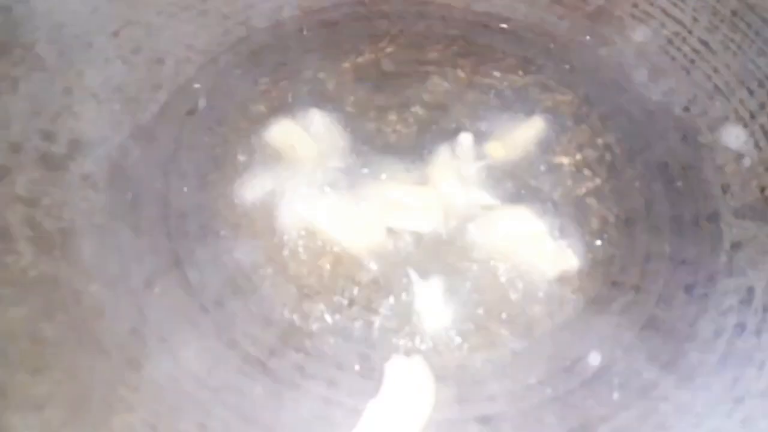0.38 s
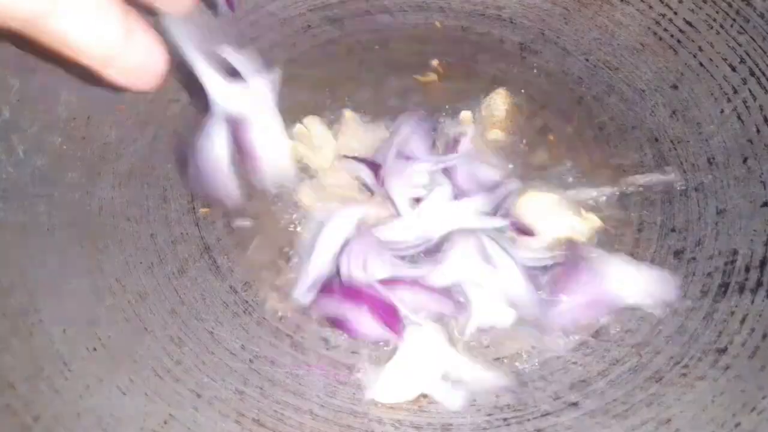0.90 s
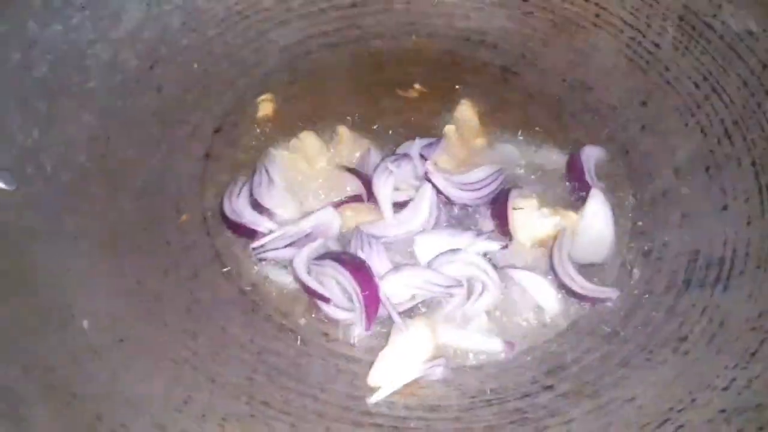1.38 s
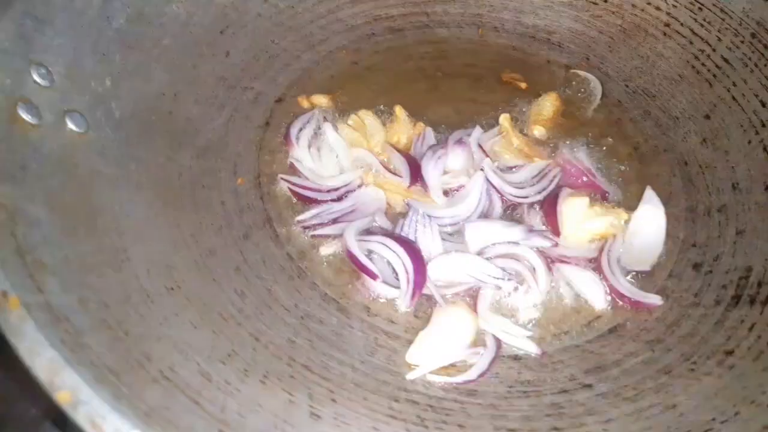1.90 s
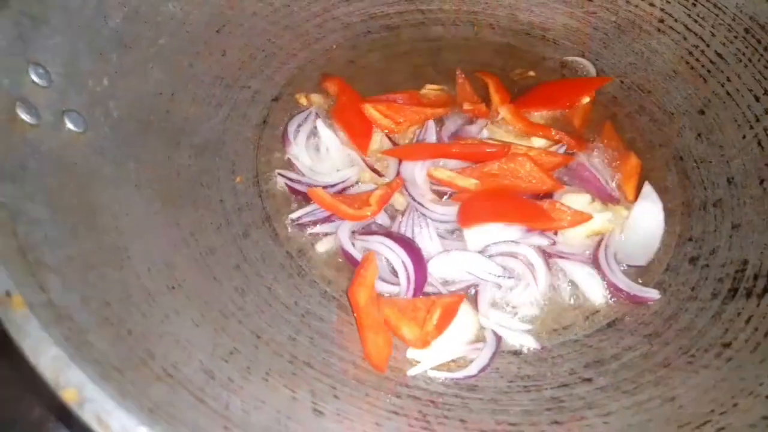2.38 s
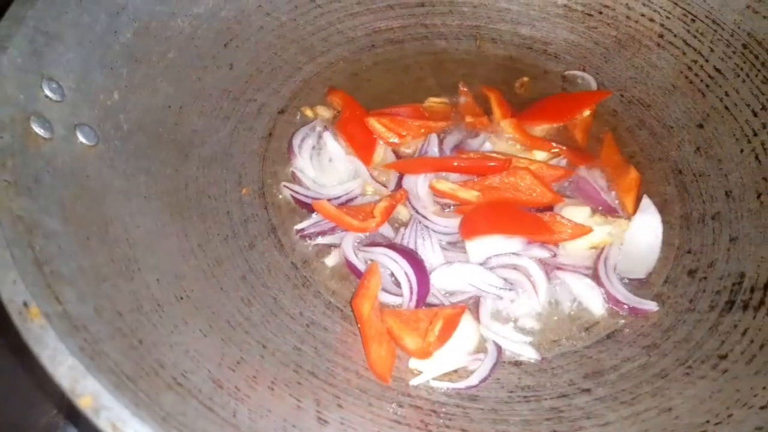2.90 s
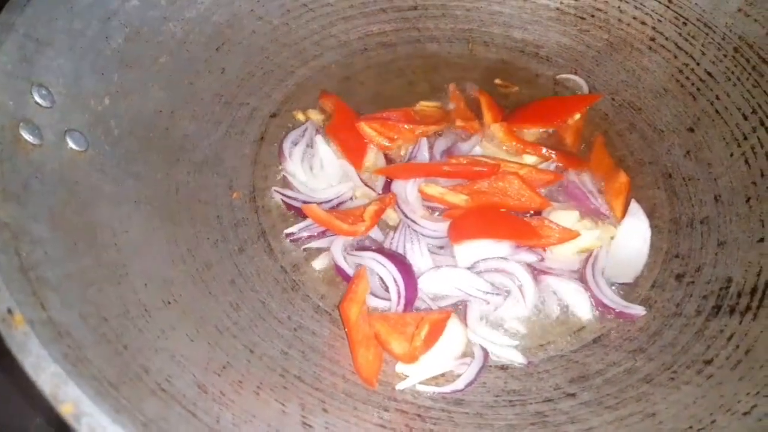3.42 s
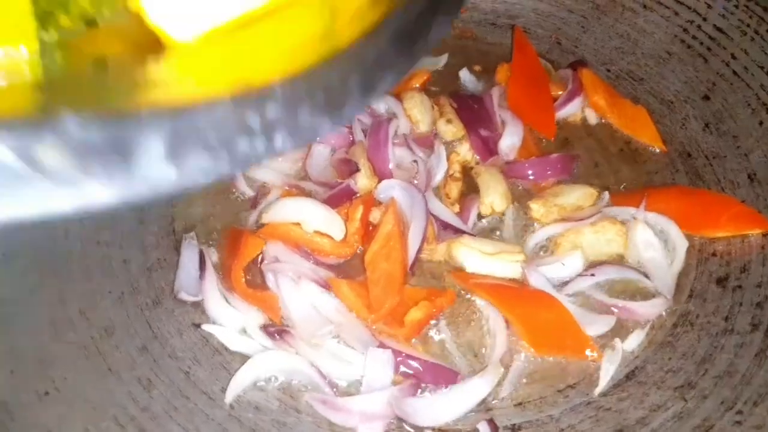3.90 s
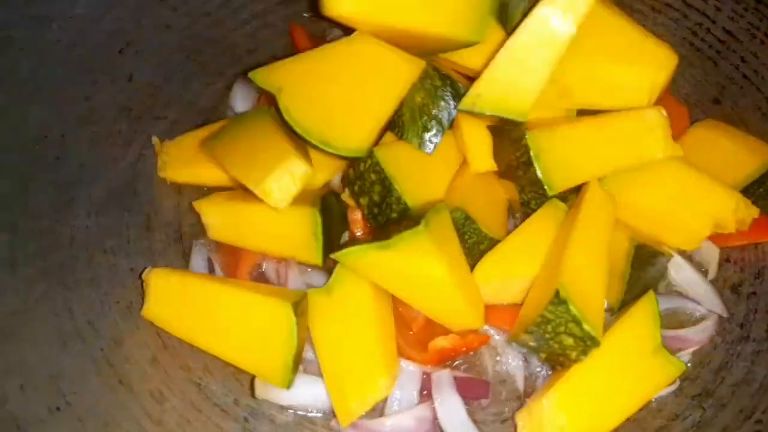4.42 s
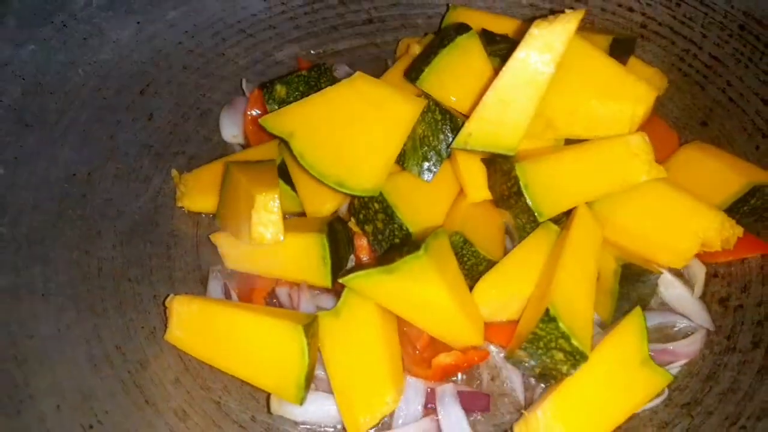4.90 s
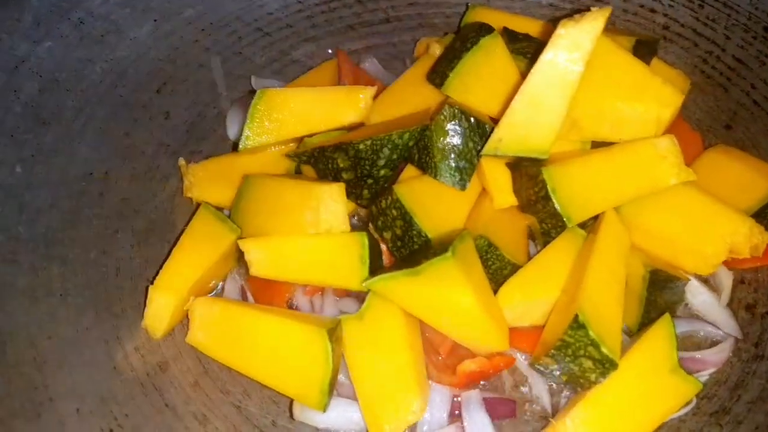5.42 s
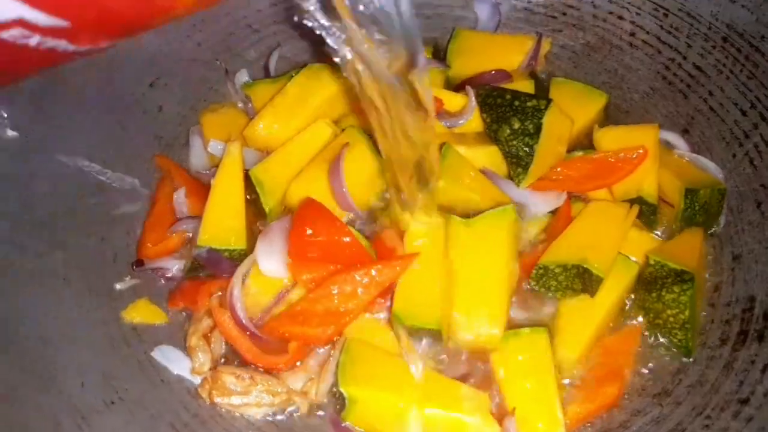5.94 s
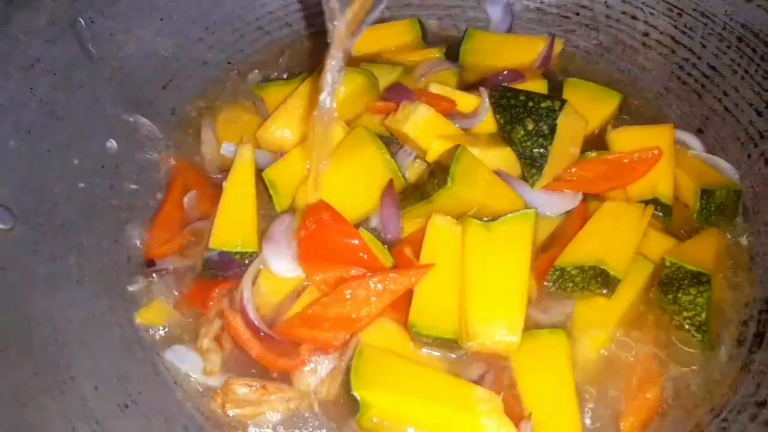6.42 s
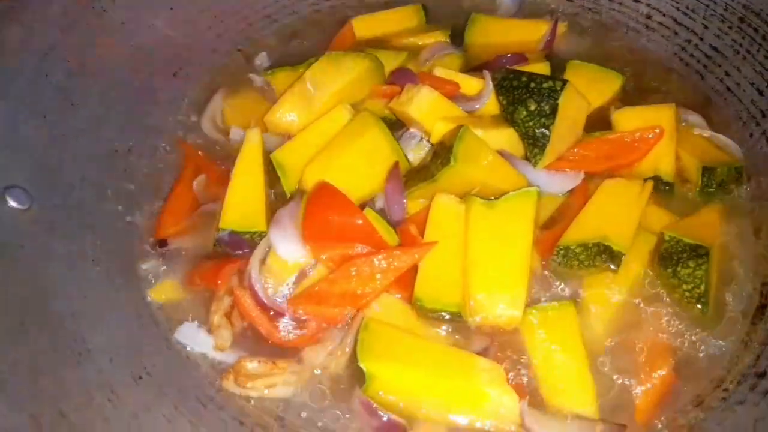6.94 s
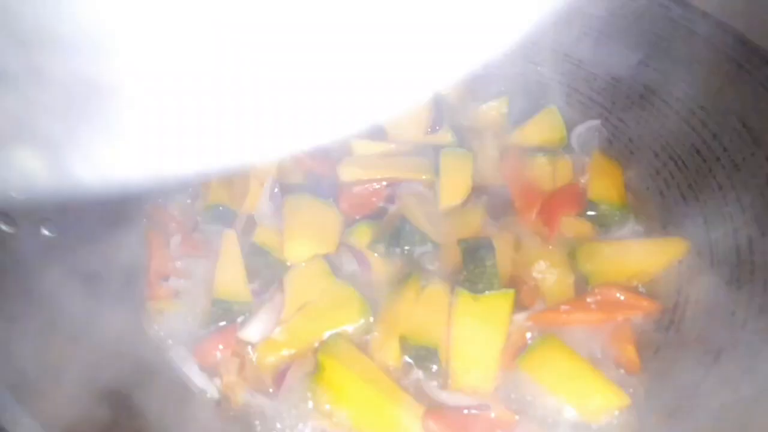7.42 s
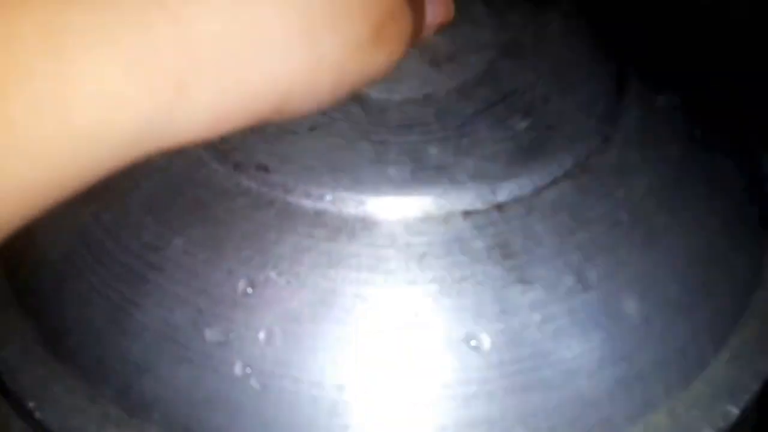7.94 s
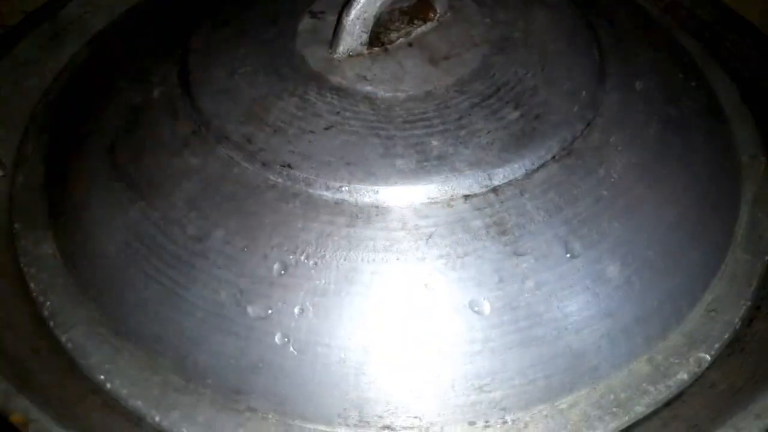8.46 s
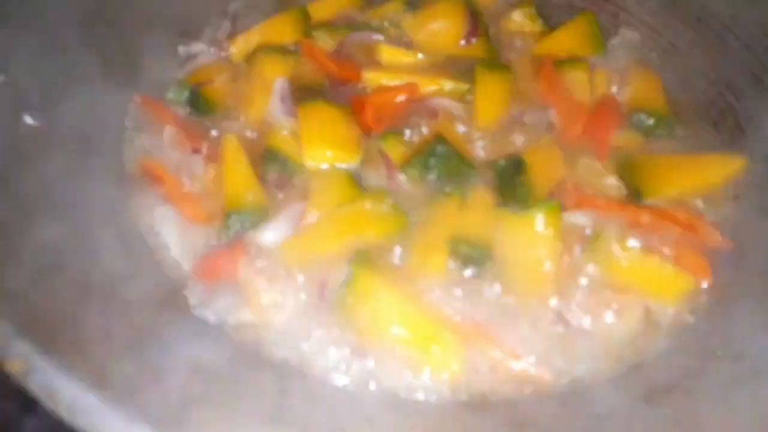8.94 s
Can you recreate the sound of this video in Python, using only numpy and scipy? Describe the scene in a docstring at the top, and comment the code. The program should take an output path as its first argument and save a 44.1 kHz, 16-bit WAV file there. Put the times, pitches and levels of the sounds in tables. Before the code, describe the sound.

Violent frying crackle in a thin wok settles to a lighter sizzle, then vegetable thuds, bubbling liquid, a ringing metal lid and a brief simmer.

```python
"""Stir-fry in a thin metal wok

Heard close by a two-port microphone, in short scenes joined by silent cuts. Wet food hits hot oil and
spatters the ports, frying pops and hisses, squash tumbles in, water is poured, a lid clanks down on the
quiet pan, and the stew simmers at the end. Hiss, spray and rumble are shaped noise; bubbles, wok and lid
are struck resonators; pops, spits, drops and thuds are short bursts laid on top."""
import sys
import numpy as np
from scipy import signal
from scipy.io import wavfile
from scipy.ndimage import uniform_filter1d, minimum_filter1d

SR = 44100
rng = np.random.default_rng(int(sys.argv[2]) if len(sys.argv) > 2 else 0)


def boost_factor(decibels):
    """Convert a level in decibels to a linear amplitude factor."""
    exponent = np.asarray(decibels, float) / 20
    return 10 ** exponent


def file_out(sig):
    """Save sig as 16-bit WAV at sys.argv[1]."""
    # one column per channel
    cols = np.atleast_2d(sig).T
    # limit, then scale
    lim = np.clip(cols, -1, 1)
    pcm = np.round(lim * 32767).astype(np.int16)
    wavfile.write(sys.argv[1], SR, pcm)


N = 399987


def table(rows):
    """Columns of a table."""
    return np.array(rows, float).T


def rms_one(x):
    """Scale to rms 1."""
    return x / np.sqrt(np.mean(x ** 2) + 1e-20)


def clock(length_s):
    """Time axis of a short sound [s]."""
    return np.arange(round(length_s * SR)) / SR


def in_time(rows):
    """Straight lines between rows, one value a sample."""
    time_s, *columns = table(rows)
    return [np.interp(np.arange(N) / SR, time_s, column) for column in columns]


def at_hz(points, hz):
    """Read a spectrum on a log frequency axis."""
    points_hz, points_db = table(points)
    return np.interp(np.log(hz), np.log(points_hz), points_db)


def sides(pan_db):
    """Left and right gains for an L-R difference."""
    return boost_factor(np.array([pan_db / 2, -pan_db / 2]))


def drift(corner_hz):
    """Slow random wander of rms 1, made at SR / 16."""
    r = np.exp(-32 * np.pi * corner_hz / SR)
    white = rng.standard_normal(N // 16 + 1002)
    slow = signal.lfilter([1], [1, -2 * r, r * r], white)[1000:]
    return np.interp(np.arange(N) / 16, np.arange(len(slow)), rms_one(slow))


def band(x, low_hz, high_hz):
    """Band-pass."""
    sos = signal.butter(2, [low_hz, min(high_hz, .45 * SR)], "band", fs=SR, output="sos")
    return signal.sosfilt(sos, x + 1e-18)


def ring(clicks, hz, t60_s):
    """Two-pole resonator: a unit click starts a decaying sine of height 1."""
    r, w = boost_factor(-60 / (t60_s * SR)), 2 * np.pi * hz / SR
    return signal.lfilter([0, np.sin(w)], [1, -2 * r * np.cos(w), r * r], clicks + 1e-18)


def add(out, time_s, sound):
    """Mix a short sound in at a time."""
    i = round(time_s * SR)
    out[..., i:i + sound.shape[-1]] += sound[..., :N - i]


def grains(per_s, spread_db):
    """Random clicks of widely spread size at each port, rms about 1."""
    tail = np.minimum(rng.exponential(1, (2, N)), 4.2)
    sizes = boost_factor(spread_db * tail) * rng.choice([-1, 1], (2, N))
    mean_square = per_s / SR / (1 - np.minimum(spread_db * np.log(10) / 10, .8))
    return sizes * (rng.random((2, N)) < per_s / SR) / np.sqrt(mean_square)


# scenes: (start [s], end [s], grain spread [dB], lone-grain share [0-1], spitting [dB],
#          rumble tilt below 200 Hz [dB/octave], rumble likeness of the ports [0-1])
SCENE_ROWS = [(0.023, 0.791, 6, 0.22, 3.5, 2.5, 0.3), (0.932, 1.898, 4.5, 0.21, 2.5, 3.5, .15),
              (1.9763, 3.535, 4.5, 0.4, 3.5, 9.5, 0.8), (3.574, 3.584, -1, 0.5, 5, -4.5, 0.97),
              (3.602, 5.559, 4.5, 0.23, 2.16, 1.5, 0.3), (5.62, 7.26, 3.5, 0.2, 1.7, -5, 0.5),
              (7.327, 8.694, 3, 0.7, 3, 0, 0.3), (8.784, 9.21, 5, 0.7, 0.5, -13.5, 0.7)]


def per_scene(column):
    """A scene's value held through it."""
    ends_s = table(SCENE_ROWS)[1]
    return column[np.searchsorted(ends_s, np.arange(N) / SR).clip(0, len(SCENE_ROWS) - 1)]


def cuts(fade_in_s=0.0015, fade_out_s=0.00039):
    """Exponential fades at each scene's ends, silence between."""
    t = np.arange(N) / SR
    return sum(np.exp(np.minimum((t - start_s) / fade_in_s, 0) + np.minimum((end_s - t) / fade_out_s, 0))
               for start_s, end_s, *_ in SCENE_ROWS)


# rumble spectrum, relative: (frequency [Hz], density [dB per Hz])
RUMBLE_SPECTRUM = [(18, -47), (30, -56), (96, -11), (244, -7.5), (264, -6), (296, -2.5), (384, -13),
                   (420, 8), (450, 10.5), (580, -37), (990, -120)]
# colour difference of the ports: (frequency [Hz], L-R [dB])
PORT_COLOUR = [(100, 2), (700, 1), (2000, 7), (5500, -3), (11000, 5)]


def rumble(level_db):
    """Flame and boiling shake the pan: low noise, less alike at the ports where hot steam blows over them."""
    edges_hz, out = 30 * 2 ** (np.arange(12) / 3), 0
    white = rng.standard_normal((2, 2, N))
    tilt_db, alike = (per_scene(column) for column in table(SCENE_ROWS)[5:])
    alike = np.clip(alike, 0, 1)
    for k, (low, high) in enumerate(zip(edges_hz, edges_hz[1:])):
        mid, side = band(white[k % 2], low, high)
        hz = np.sqrt(low * high)
        octaves_down = np.clip(np.log2(200 / hz), 0, 2.2)
        gain = boost_factor(at_hz(RUMBLE_SPECTRUM, hz) + tilt_db * octaves_down + 4.0 * drift(3.5))
        out = out + gain * (np.sqrt(1 + alike) * mid + np.sqrt(1 - alike) * side * [[1], [-1]])
    out = rms_one(out)
    bowl_hum = ring(out, 268, 0.053) + ring(out, 301.8, 0.38)
    out = out + boost_factor(-10.5) * rms_one(bowl_hum)
    return boost_factor(level_db) * rms_one(out) * sides(at_hz(PORT_COLOUR, 150))[:, None]


def bubbling(level_db, lumps_db, cycles=4.3, alike=0.064):
    """Bubbles in oil and water: clicks ring resonators for a few cycles (t60), slightly shared by the ports."""
    pitches_hz = np.geomspace(520, 1250, num=14)
    clicks, dealt = grains(2500, 2.6), rng.integers(0, len(pitches_hz), N)
    clicks = clicks + alike * clicks[::-1]
    rings = sum(ring(clicks * (dealt == k), hz, cycles / hz) for k, hz in enumerate(pitches_hz))
    rings = band(band(rings, 600, 2200), 400, 1700) * boost_factor(lumps_db * drift(15))
    return boost_factor(level_db) * rms_one(rings) * sides(at_hz(PORT_COLOUR, 780))[:, None]


# lid on rim: (time [s], blow level [dB], crack [dB re blow level], hardness corner [Hz], favoured mode [Hz])
LID_CLANKS = [(7.481, -43, 5, 2200, 810), (7.631, -12, -9, 4000, 760), (7.636, -15, -28, 3500, 2474),
              (7.640, -14.5, -38, 600, 237), (7.648, -14, -30, 3000, 1600), (7.801, -19, -27, 1220, 630),
              (7.806, -24, -22, 600, 285), (7.849, -26.5, -26, 3480, 2474), (7.856, -24, -31, 1500, 806),
              (7.86, -29, -30, 600, 285), (7.875, -23.5, -30, 900, 810), (7.885, -33, -30, 500, 285),
              (7.912, -15, -3.5, 5000, 550), (7.915, -14.5, -23, 4030, 550), (8.04, -39.5, 1, 5000, 3548),
              (8.077, -30, -10, 1500, 322), (8.085, -22.5, -17, 900, 322), (8.091, -22, -8.5, 3500, 322),
              (8.105, -22, -28, 600, 322), (8.124, -11, -17.5, 2440, 368), (8.14, -20, -30, 600, 322),
              (8.16, -22, -30, 600, 285), (8.127, -16, -16, 5000, 2474), (8.13, -18, -27, 2000, 820),
              (8.149, -24, -26, 2200, 1540), (8.185, -21.5, -27, 1500, 285),
              (8.198, -15.5, -10, 4460, 1010), (8.21, -19, -25, 900, 368), (8.222, -23, -31, 600, 237),
              (8.245, -28, -24, 500, 237)]
# lid rocking into place: (time [s], relative rattle level [dB])
LID_ROCKING = [(7.79, -67), (7.81, -26), (7.9, -23), (7.96, -27.5), (8.0, -47), (8.06, -29), (8.09, -9),
               (8.12, -24), (8.19, -18.5), (8.23, -25.5), (8.29, -60), (8.32, -71)]
# lid modes while free: (frequency [Hz], relative level [dB], t60 [s])
LID_MODES = [(237, -15.5, 0.13), (285, -10.5, 0.12), (322, -14.5, 0.17), (368, -17, 0.071), (477, -13, .07),
             (550, -8, 0.054), (605, -14, 0.078), (650, -13.5, 0.11), (748, -8, 0.041), (807, -11.5, 0.15),
             (844, -14, 0.056), (1010, -12.5, 0.061), (1156, -16.5, 0.038), (1330, -2, 0.023),
             (1538, -19, 0.19), (1556, -15, 0.38), (1864, -14.5, 0.055), (2040, -10, .07),
             (2474, -17.5, 0.21), (2700, -18.5, .05), (3100, -26, 0.052), (3381, -23, .08),
             (3550, -20.5, 0.06), (3849, -19.5, .08), (4344, -25.5, 0.051), (4818, -24, .12),
             (6130, -18.5, .06), (6990, -26.5, 0.08), (7300, -19, .07)]
SEATED_S, SEATED_T60_S = 8.19, 0.065


def lid():
    """Clanks and a rocking rattle drive the lid's modes, damped once seated; each clank adds a noise crack."""
    out, t = np.zeros((2, N)), clock(.034)
    start, stop = round(7.4 * SR), round(8.7 * SR)
    rattle = (boost_factor(in_time(LID_ROCKING)[0] - 27.5) * grains(1800, 4.3)[0])[start:stop]
    clank_s, blow_db, _, hardness_hz, contact_hz = table(LID_CLANKS)
    at = (clank_s * SR).round().astype(int) - start
    since_s = np.arange(start, stop) / SR - SEATED_S
    free, damping = since_s < 0, boost_factor(-60 * np.maximum(since_s, 0) / SEATED_T60_S)
    for k, (hz, level_db, t60_s) in enumerate(LID_MODES):
        blows = rattle * boost_factor(-3.5 * np.log2(hz / 300))
        hardness_db = -10 * np.log10(1 + (hz / hardness_hz) ** 4)
        favoured_db = 13 * np.exp(-(np.log2(hz / contact_hz) / 0.083) ** 2)
        chance_db = rng.normal(0, 2, len(at))
        blows[at] += boost_factor(blow_db + hardness_db + favoured_db + chance_db)
        # the deep rocking of the whole lid goes on after seating
        seated_t60_s = t60_s if hz < 400 else min(t60_s, SEATED_T60_S)
        free_ring = ring(blows * free, hz, t60_s) * (damping if hz > 400 else 1)
        rung = free_ring + ring(blows * ~free, hz, seated_t60_s)
        right = 0.75 * (-1) ** (k * (hz > 900))     # higher modes: in and out of phase by turns
        out[:, start:stop] += boost_factor(level_db - 2.5) * rung * [[1], [right]]
    out[:, start:stop] += boost_factor(-4.5) * band(rattle, 2500, 5200)      # rim scrape
    noises = rng.standard_normal((len(LID_CLANKS), 2, len(t)))
    for (time_s, level_db, crack_db, *_), noise in zip(LID_CLANKS, noises):
        crack = rms_one(band(band(noise, 400, 6400), 300, 6800)) * np.exp(-t / 0.0089)
        add(out, time_s, boost_factor(level_db + crack_db) * crack)
    return band(band(out, 230, 14000), 130, 16000)      # a small lid radiates no deep bass


# soft knocks of food, bowl and hand: (time [s], relative level [dB], frequency [Hz], L-R [dB])
SOFT_KNOCKS = [(0.969, -25, 130, 14), (0.988, -19.5, 300, 21.5), (0.997, -23, 800, 13.5),
               (1.005, -24, 140, 17), (1.056, -24, 200, -11), (1.066, -24, 101, -15.5),
               (1.07, -19, 232, -16), (1.155, -23.5, 800, -5), (1.175, -23.5, 237, -24.5),
               (1.24, -30, 300, 6), (1.435, -25.5, 281, 8), (1.542, -25, 200, 22), (2.163, -22.5, 306, 3),
               (3.566, -27.5, 183, 8), (3.577, -25.5, 194, 2), (3.600, -26, 164, 2), (3.7, -27, 176, 6),
               (3.985, -26.5, 720, -7), (3.996, -25, 740, 0), (4.006, -22, 282, 4), (4.05, -32, 280, -6),
               (4.056, -30, 676, 0), (4.14, -27, 527, -4), (4.235, -30, 584, 4), (4.392, -25, 275, 9),
               (4.4, -31, 640, 3), (4.41, -24.5, 440, 5), (4.412, -35, 900, 3), (4.43, -38, 267, 2),
               (4.492, -33, 108, 6), (4.556, -26.5, 440, 2), (4.566, -22.5, 300, 1), (4.57, -23.5, 620, 2),
               (4.81, -30.5, 200, 5), (4.925, -28, 183, 2), (4.94, -26, 199, 5), (5.005, -26, 600, 3),
               (5.016, -15, 440, 6), (5.03, -12.5, 630, 2), (5.034, -27, 1165, 5), (5.05, -28, 345, 4),
               (5.07, -33, 1165, 6), (5.045, -27, 165, 2), (5.11, -25, 600, 5), (5.125, -23.5, 496, 7),
               (5.14, -30, 345, 0), (5.151, -27.5, 272, 5)]
# food tumbling and settling: (start [s], end [s], loudest relative level [dB], rate [knocks/s])
TUMBLING_FOOD = [(3.801, 4.403, -29, 56), (5.05, 5.2, -33, 90)]
# wok modes when struck: (frequency [Hz], relative level [dB], t60 [s])
WOK_MODES = [(163, -10, 0.24), (267, -10.5, 0.23), (345, -15.5, 0.39), (496, -16.5, 0.3),
             (548, -12.5, 0.23), (1010, -30, 0.3), (1165, -13, 0.43)]


def knocks(cycles=2.53, wok_db=-9.5, scuff_db=-17):
    """A dull decaying thud with a rough scuff; after 2 s each also rings the wok, best near its own pitch."""
    out, t = np.zeros((2, N)), clock(.5)
    wok_hz, mode_db, t60_s = table(WOK_MODES)[:, :, None]
    patter = []
    for start_s, end_s, top_db, per_s in TUMBLING_FOOD:
        length_s = end_s - start_s
        for u, v, w, x in rng.random((60, 4))[:int(per_s * length_s)]:
            patter.append((start_s + length_s * u, top_db - 9 * v, 190 * 2 ** (2.0 * w), 8 * x - 1))
    for time_s, level_db, hz, pan_db in list(SOFT_KNOCKS) + patter:
        chance_db, noise = rng.normal(0, 2, (len(WOK_MODES), 1)), rng.standard_normal(len(t))
        thud = -np.sin(2 * np.pi * hz * t) * np.exp(-3 * t * hz / cycles) * np.minimum(t * hz / 0.46, 1)
        rough = band(band(noise, 0.73 * hz, 1.7 * hz), 0.71 * hz, 1.8 * hz)
        scuff = boost_factor(scuff_db) * rms_one(rough) * np.exp(-t / 0.012)
        octaves = np.log2(wok_hz / hz)
        near_db = -8 * np.abs(octaves) + 10 * np.exp(-(octaves / .06) ** 2)
        metal_db = wok_db + mode_db + near_db + chance_db - 60 * t / t60_s
        metal = (boost_factor(metal_db) * np.sin(2 * np.pi * wok_hz * t)).sum(axis=0)
        knock = thud + scuff + (time_s > 2) * metal
        add(out, time_s, boost_factor(level_db + 3.0) * knock * sides(pan_db)[:, None])
    return out


# big drops on a port: (time [s], spike level [dB], recoil level [dB], port [1 left, -1 right])
BIG_DROPS = [(0.0809, 0, -6.5, -1), (0.1173, 4.5, -1.5, 1), (0.1489, 6, 3, 1), (0.1521, 1, 7, 1),
             (0.1715, 3.5, -9.5, 1), (0.1746, 17, -24, 1), (0.1874, -2, -20.5, 1), (0.2255, -8, -11, 1),
             (0.2333, -11.5, 6.5, -1), (0.2562, 7, 3.5, 1), (0.2936, -4, -22, 1), (0.2986, -4.5, -12, 1),
             (0.3054, 0, -14, 1), (0.3165, -4, -22.5, 1), (0.353, -10, -17, 1), (0.391, -12, -23.5, -1),
             (0.4401, 9, 5, 1), (0.4821, -5.5, -19, 1), (0.486, -10, -22, -1), (0.513, -23, -25, 1),
             (0.5215, -12, -19, 1), (0.556, -8, -16, -1), (0.560, -10, -15, 1), (0.5796, -0.5, -0.5, -1),
             (0.627, -14.5, -21, 1), (0.652, -11, -27, 1), (0.6916, -2.5, -19, 1), (0.737, -13, -25, 1),
             (0.7801, -12, -20.5, -1)]


def spatter(spike_s=.00008, recoil_s=0.00041, sway_hz=95, sway_s=0.0059):
    """A drop on one port: sharp spike, recoil, slow sway; small drops fall at random in the first 1.9 s."""
    out, t = np.zeros((2, N)), clock(0.033)
    small = []
    for a, b, c in rng.random((90, 3)):
        fall_db = 14 * b + 12 * a
        small.append((.06 + 1.8 * a ** 2.4, -6 - fall_db, -18 - fall_db, 1 if c < .6 else -1))
    late = np.maximum(t - .0006, 0)
    recoil = -2.4 * late / recoil_s * np.exp(-late / recoil_s)
    sway = .5 * np.sin(2 * np.pi * sway_hz * late) * np.exp(-late / sway_s)
    sway = sway + 0.12 * np.sin(np.pi * sway_hz * late) * np.exp(-late / 0.011)
    for time_s, spike_db, recoil_db, port in list(BIG_DROPS) + small:
        spike = boost_factor(spike_db) * np.exp(-.5 * ((t - .0005) / spike_s) ** 2)
        add(out[0 if port > 0 else 1], time_s - .0005, spike + boost_factor(recoil_db) * (recoil + sway))
    return out


def squeals(level_db, per_s=40, length_s=.012):
    """Steam squeezing out from under the food: brief narrow hisses at scattered pitches."""
    pitches_hz, out = np.geomspace(3700, 7300, num=10), 0
    white, dealt = rng.standard_normal((2, N)), rng.integers(0, len(pitches_hz), N)
    born = (rng.random(N) < per_s / SR) * rng.uniform(0.17, 1, N)
    fade = np.exp(-1 / (length_s * SR))
    for k, hz in enumerate(pitches_hz):
        swell = signal.lfilter([1 - fade], [1, -2 * fade, fade ** 2], born * (dealt == k) + 1e-18)
        out = out + ring(white * swell, hz, 0.017)
    return boost_factor(level_db) * rms_one(out)


# longer spits of steam: (time [s], level [dB], frequency [Hz], decay [s])
STEAM_SPITS = [(0.520, -20, 5500, 0.023), (0.620, -17, 5550, .03), (2.101, -26, 5380, 0.0087),
               (2.360, -24, 3500, .02), (2.368, -30, 5500, 0.02), (2.394, -25.5, 4970, .03),
               (2.585, -28, 6200, 0.02), (2.602, -22.5, 5500, .02), (2.61, -26, 3430, .02),
               (2.728, -25, 7000, .01), (2.846, -23, 5270, 0.017), (2.94, -26, 4900, .012),
               (2.985, -23.5, 5600, 0.012), (3.172, -22, 6140, .012), (3.275, -25, 4300, .012),
               (3.342, -26.5, 6900, .015)]


def spits(width=1.12, pan_db=-5):
    """A wet spot flashes to steam: a narrow hiss that starts sharply and dies away."""
    out, t = np.zeros((2, N)), clock(.15)
    noises = rng.standard_normal((len(STEAM_SPITS), 2, len(t)))
    for (time_s, level_db, hz, decay_s), noise in zip(STEAM_SPITS, noises):
        shape = np.minimum(t / 0.002, 1) * np.exp(-t / decay_s)
        hiss = rms_one(band(noise, hz / width, hz * width)) * shape
        add(out, time_s, boost_factor(level_db) * hiss * sides(pan_db)[:, None])
    return out


# loud steam pockets bursting in oil: (time [s], level [dB], frequency [Hz], L-R [dB], bright snap level [dB])
STEAM_POPS = [(0.208, -11.5, 3440, 0, -23.5), (0.3611, -13, 2900, 2, -23), (0.377, -15, 800, 4, -28),
              (0.3931, -14.5, 2190, 2, -22.5), (0.404, -17.5, 3820, 4, -25.5),
              (0.4222, -5, 2470, -1, -23.5), (0.4564, -10, 3750, 3.5, -26),
              (0.5059, -12.5, 5000, -1.5, -12.5), (0.5223, -13.5, 3900, 2.5, -19.5),
              (0.535, -18, 2540, 2.5, -22), (0.563, -16.5, 1770, 1, -29), (0.5861, -10.5, 1800, 0, -31),
              (0.649, -15.5, 2630, -0.5, -17), (0.6604, -7.5, 1990, -4.5, -27),
              (0.677, -13, 2700, -2.5, -23), (0.6819, -8, 1890, 1, -24), (0.7443, -15, 3820, 2, -29),
              (0.9395, -6.5, 6500, -2, -19), (1.3004, -15.5, 1050, -9.5, -13), (1.5702, -14, 3800, 7, -11),
              (2.1256, -5, 6500, -7, -21), (2.150, -16.5, 5160, -3, -21), (2.1691, -16, 3870, 1.5, -23),
              (2.1954, -13, 5000, -9.5, -27), (2.2955, -22.5, 4770, -2.5, -13.5),
              (2.304, -14, 7100, -4, -18), (2.3595, -10.5, 3330, 2, -20.5), (2.369, -16.5, 5630, -2, -14),
              (2.6045, -15.5, 5450, -3, -25), (2.7110, -20, 6800, -5.5, -7.5),
              (2.7244, -12, 2600, 0.5, -20), (2.7312, -21, 6980, -1, -27.5), (2.7999, -7, 5670, -4, -15.5),
              (2.801, -11, 2650, -0.5, -27.5), (2.8167, -18, 1190, 0.5, -20),
              (2.9743, -33.5, 7050, 4, -9.5), (2.849, -20.5, 4270, -3, -27),
              (2.9828, -16.5, 4220, 0, -22.5), (2.9935, -17.5, 5700, -8, -28),
              (3.0318, -19.5, 6300, -7.5, -7.5), (3.0506, -18, 6050, -10.5, -28.5),
              (3.1728, -13.5, 6000, -3, -15), (3.2327, -7, 5000, -6.5, -20),
              (3.2735, -8, 5630, -0.5, -25.5), (3.2925, -18.5, 940, 2.5, -26.5),
              (3.3424, -23, 7130, -7, -24.5), (3.3522, -19, 3210, 1, -27), (3.4021, -23, 7000, -8, -26),
              (3.476, -16.5, 5660, -6.5, -26), (5.7460, -17, 6060, 2.5, -12.5),
              (5.8513, -15, 1900, -2, -8.5), (5.8797, -18.5, 6750, 5.5, -12.5),
              (6.0687, -20, 5670, -3, -12), (6.440, -16.5, 6240, -1.5, -14.5),
              (7.1266, -16.5, 1510, 2.5, -13)]


def pops(sputter_db=-5, sputter_s=0.0032, crack_db=-6, burst_s=0.0012):
    """Tone burst, crack, bright snap and ms of sputter, phase free at each port; small ones at random."""
    out, t = np.zeros((2, N)), clock(.025)
    small = []
    for a, b, c, d in rng.random((110, 4)):
        small.append((.03 + 3.5 * a, -19 - 9 * a - 7 * b, 3000 * 2 ** (1.3 * c), 14 * d - 11, -30 - 8 * a))
    for time_s, level_db, hz, pan_db, snap_db in list(STEAM_POPS) + small:
        noise, phase = rng.standard_normal((2, len(t))), 2 * np.pi * rng.random((2, 1))
        burst = np.sin(2 * np.pi * hz * t + phase) * np.exp(-t / burst_s) * np.minimum(t / 0.000092, 1)
        sputter = boost_factor(sputter_db) * rms_one(band(noise, 0.92 * hz, 1.104 * hz)) * np.exp(-t / sputter_s)
        crack = boost_factor(crack_db) * noise * np.exp(-t / 0.00009)
        snap = boost_factor(snap_db) * band(np.sign(noise[0]) * np.exp(-t / .0002), 1500, 15000)
        pop = boost_factor(level_db) * (burst + sputter + crack) + snap
        add(out, time_s, pop * sides(pan_db)[:, None])
    return out


# sizzle spectrum, relative within crackle, sizzle and spray: (frequency [Hz], density [dB per Hz])
SIZZLE_SPECTRUM = [(590, -36), (1000, -11), (1160, -9), (1260, -6.5), (2130, -8), (5570, -2), (7100, 11.5),
                   (8650, -15), (12500, -8.5), (15100, -16), (16000, -17)]


def sizzle(crackle_db, sizzle_db, spray_db, pan_db):
    """Countless bursting droplets: dense hiss plus lone grains, each grain ringing in three third-octaves."""
    spread_db, lone, spit_db = (per_scene(column) for column in table(SCENE_ROWS)[2:5])
    lone = np.clip(lone, 0, 1)
    edges_hz = 8200 * 2 ** (np.arange(-9, 4) / 3)
    clicks, dealt = grains(9000, spread_db), rng.integers(0, 4, (2, N))
    white = rng.standard_normal((2, 2, N))
    layers = np.zeros((3, 2, N))     # crackle, sizzle, spray
    spitting = 0.5 * drift(11.2) + 0.24 * drift(34)     # common to all bands
    for k, (low, high) in enumerate(zip(edges_hz, edges_hz[1:])):
        hz = np.sqrt(low * high)
        # a grain goes to every fourth band
        drive = np.sqrt(1 - lone) * white[k % 2] + 2 * np.sqrt(lone) * clicks * (dealt == k % 4)
        flicker_db = spit_db * (.8 if hz > 8200 else 1) * (spitting + 0.63 * drift(26))
        gain = boost_factor(at_hz(SIZZLE_SPECTRUM, hz) + flicker_db)
        layer = int(hz > 3000) + int(hz > 8200)
        layers[layer] += gain * band(drive, low, high) * sides(at_hz(PORT_COLOUR, hz))[:, None]
    layers[1] = band(layers[1], 2500, 5580)     # sizzle is rolled off above 5.6 kHz, below the fine spray
    levels_db = (crackle_db, sizzle_db, spray_db)
    return sum(boost_factor(db) * rms_one(x) for db, x in zip(levels_db, layers)) * sides(pan_db)


# vigour of the frying: (time [s], sizzle level [dB], fine spray level [dB])
FRYING_LEVELS = [(0.03, -30.5, -22.5), (0.13, -16.5, -21.5), (0.35, -22.5, -26.5), (0.78, -24.5, -31),
                 (0.94, -26, -29.5), (1.05, -26.5, -34), (1.47, -25, -34), (1.89, -28, -34.5),
                 (1.98, -34.5, -42.5), (2.1, -34.5, -44.5), (2.3, -29, -31.5), (2.42, -33.5, -33.5),
                 (2.5, -29.5, -33), (2.6, -31, -34.5), (2.66, -35, -40.5), (2.72, -33.5, -38.5),
                 (2.9, -35, -43.5), (3.0, -37, -44), (3.1, -35, -41), (3.3, -31, -39.5), (3.52, -31, -40.5),
                 (3.61, -45, -50.5), (4.11, -44, -50), (4.34, -33.5, -45), (4.55, -35.5, -40.5),
                 (4.83, -34, -40), (5.1, -37, -40.5), (5.54, -34.5, -39.5), (5.64, -28, -36),
                 (5.93, -29.5, -37), (6.05, -29, -33), (6.7, -27.5, -39), (7.25, -29, -37.5),
                 (7.34, -47.5, -53.5), (7.45, -50, -53), (7.74, -50.5, -57), (8.0, -53, -57.5),
                 (8.36, -58.5, -62.5), (8.68, -57, -62.5), (8.8, -50.5, -54.5), (9.05, -49.5, -52.5)]
# liquid in the pan: (time [s], bubbling level [dB], rumble level [dB])
LIQUID_LEVELS = [(0.03, -41, -46), (0.2, -33, -35), (0.36, -35.5, -43), (0.78, -43.5, -47.5),
                 (0.94, -39.5, -32.5), (1.15, -34, -40), (1.3, -38.5, -43.5), (1.89, -36.5, -48.5),
                 (1.98, -48, -48.5), (2.4, -41.5, -53), (3.52, -46, -52.5), (3.61, -53.5, -50),
                 (3.72, -57, -58), (3.82, -53.5, -44), (4.2, -48, -47), (4.45, -46, -41.5),
                 (4.65, -48.5, -50), (5.2, -47, -43), (5.54, -45.5, -49), (5.64, -40.5, -56),
                 (5.93, -42.5, -49), (6.34, -35.5, -46.5), (7.04, -37, -50), (7.25, -38, -51),
                 (7.34, -43.5, -50), (7.74, -48.5, -46.5), (8.36, -57, -52), (8.68, -58.5, -52),
                 (8.8, -39.5, -40), (9.05, -40.5, -45)]
# one row a scene: (coarse crackle [dB re mean of sizzle and bubbling], sizzle L-R [dB], frying surge [dB])
SCENE_MIX = [(-3.5, -4, 0), (-2, -1, 0.5), (0.5, -4.5, 2), (-4, 1.5, 0.4), (1.4, -2, 0.4), (-0.2, -5, 0.44),
             (-1, -2.5, 1.1), (-1, -1.5, 4)]
SURGE_CORNER_HZ, LIQUID_SURGE_DB = 1.46, 0.8


def scene():
    """Frying and liquid levels drive the steady layers, which surge slowly; events are laid on top."""
    crackle_db, pan_db, surge_db = (per_scene(column) for column in table(SCENE_MIX))
    sizzle_db, spray_db = in_time(FRYING_LEVELS) + surge_db * drift(SURGE_CORNER_HZ)
    bubble_db, rumble_db = in_time(LIQUID_LEVELS) + LIQUID_SURGE_DB * drift(SURGE_CORNER_HZ)
    crackle_db = crackle_db + (sizzle_db + bubble_db) / 2
    spit_db = per_scene(table(SCENE_ROWS)[4])
    steady = rumble(rumble_db) + bubbling(bubble_db, 0.6 * spit_db)
    steady = steady + sizzle(crackle_db, sizzle_db, spray_db, pan_db)
    # the more it spits, the more it squeals
    steam = squeals(sizzle_db - 18.0 + 3.0 * spit_db) * sides(pan_db)
    return steady + steam + lid() + knocks() + spatter() + spits() + pops()


def low_pass(x):
    """Removes everything above the highest recorded frequency."""
    return signal.sosfilt(signal.butter(12, 16820, fs=SR, output="sos"), x)


MIC_LOW_HZ, LIMIT_DB, RELEASE_DB_PER_S = 35, -3, 365.5


def record(dry):
    """Bass cut, a look-ahead limiter shared by both ports, then the cuts between scenes."""
    x = signal.sosfilt(signal.butter(2, MIC_LOW_HZ, "high", fs=SR, output="sos"), dry)
    over_db = np.maximum(20 * np.log10(np.abs(x).max(axis=0) + 1e-9) - LIMIT_DB, 0)
    slope_db = RELEASE_DB_PER_S * np.arange(N) / SR
    held_db = np.maximum.accumulate(over_db + slope_db) - slope_db
    ahead_db = uniform_filter1d(-minimum_filter1d(-held_db, size=441), size=221)
    mix = x * boost_factor(-ahead_db) * cuts()
    return low_pass(mix)


dry = scene()
out = record(dry)
file_out(out)
```